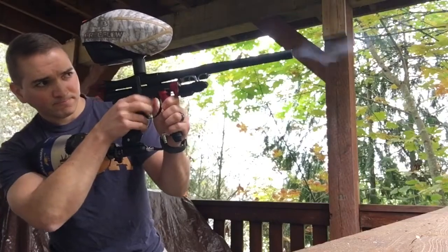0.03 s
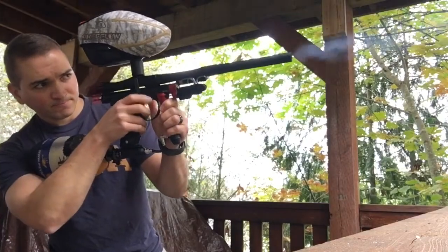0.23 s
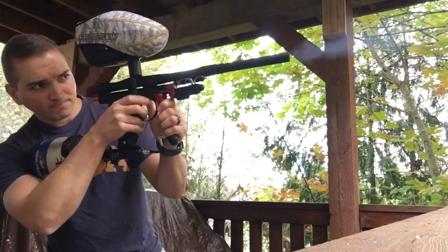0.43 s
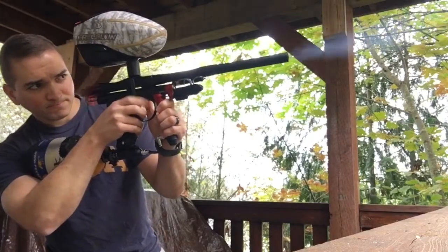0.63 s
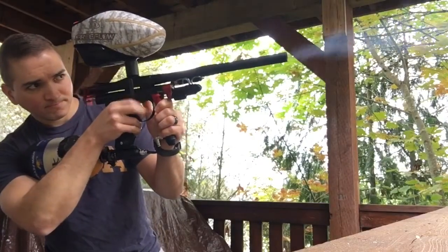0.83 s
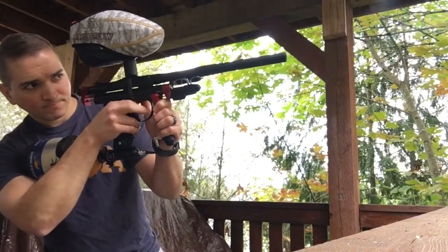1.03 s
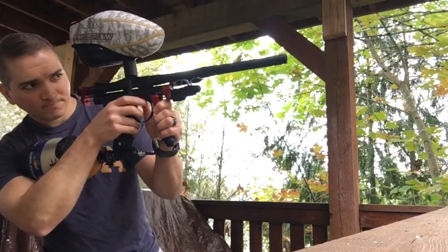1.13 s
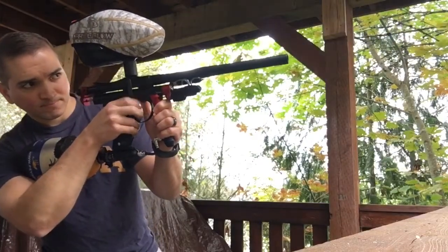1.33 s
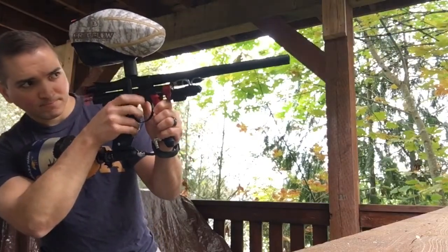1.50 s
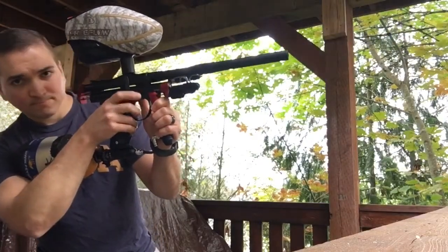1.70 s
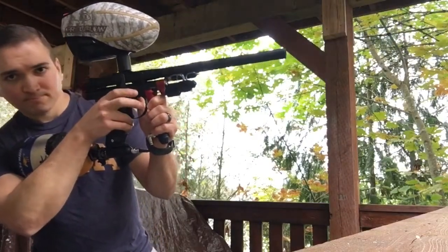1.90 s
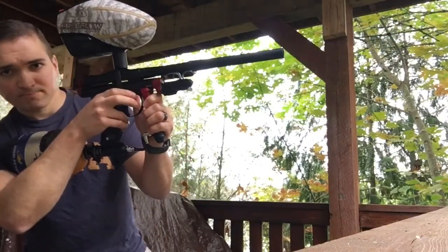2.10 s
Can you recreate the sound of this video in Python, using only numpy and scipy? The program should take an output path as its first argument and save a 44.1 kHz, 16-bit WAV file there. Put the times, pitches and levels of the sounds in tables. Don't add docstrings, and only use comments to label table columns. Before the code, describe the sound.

Paintball gun fires a fast even string of loud pops, then a few slower, uneven shots

```python
import sys
import numpy as np
from scipy import signal
from scipy.fft import rfft, irfft, next_fast_len
from scipy.io import wavfile
from scipy.ndimage import uniform_filter1d, map_coordinates

SR = 44100
rng = np.random.default_rng(int(sys.argv[2]) if len(sys.argv) > 2 else 0)


def store_pcm(level_fs):
    pcm = np.round(np.clip(level_fs, -1, 1) * 32767).astype(np.int16)
    wavfile.write(sys.argv[1], SR, np.atleast_2d(pcm).T)


def invert_db(level):
    return 10 ** (np.asarray(level, dtype=float) / 20)


N = 94859


def unit(x):
    return x / np.sqrt(np.mean(x ** 2) + 1e-20)


def along(points, hz):
    f, v = np.transpose(points)
    return np.interp(np.log(hz + 1), np.log(f + 1), v)


def filtered(x, response):
    m = next_fast_len(len(x) + 8192)
    return irfft(rfft(x, m) * response(np.fft.rfftfreq(m, 1 / SR)), m)[:len(x)]


def coloured(spectrum, size):
    return unit(filtered(rng.standard_normal(size), lambda hz: invert_db(along(spectrum, hz))))


def add(track, s, sound):
    track[max(round(s * SR), 0):][:len(sound)] += sound


def since(t, s):
    return np.clip(t - s, 0, None)


def sway(t, rate_hz):
    return map_coordinates(rng.standard_normal(200), [t * rate_hz])


# (f/Hz, level/dB per Hz)
LEAVES = [(200, -57), (400, 1), (800, -7), (1700, -7), (3000, -15), (5000, -22), (7500, -32), (12000, -71)]
# (t/s, level/dB)
LEAVES_LEVEL = [(0, -42), (1.0, -46.5), (1.3, -51), (1.7, -50), (1.9, -48), (2.15, -50.5)]
# (f/Hz, width/Hz, level/dB)
FEEDER_SHELL = [(800, 150, 2), (1310, 69, 5.5), (1715, 68, 4), (2690, 140, -2)]
# (f/Hz, level/dB per Hz)
RUMBLE = [(20, -39.5), (42, -4), (70, -1), (100, -6), (160, -12.5), (280, -8), (450, -22.5), (1000, -120)]
# (t/s, level/dB)
RUMBLE_LEVEL = [(0, -42), (.95, -42.5), (1.05, -45), (1.3, -45), (1.5, -47), (1.65, -50), (1.8, -43.5),
                (1.95, -45.5), (2.05, -45), (2.15, -42)]
SHELL_OVER_LEAVES_DB = -5


def garden():
    t = np.arange(N) / SR
    leaves_db = np.interp(t, *np.transpose(LEAVES_LEVEL))
    rumble_db = np.interp(t, *np.transpose(RUMBLE_LEVEL))
    leaves = invert_db(leaves_db + 2.6 * sway(t, 35)) * coloured(LEAVES, N)

    def shell_response(hz):
        return sum(invert_db(db) / (1 + (2 * (hz - centre) / width) ** 2) for centre, width, db in FEEDER_SHELL)

    hum = unit(filtered(rng.standard_normal(N), shell_response))
    hum *= invert_db(leaves_db + SHELL_OVER_LEAVES_DB + 4.2 * sway(t, 21))
    rumble = invert_db(rumble_db + 2.2 * sway(t, 11)) * coloured(RUMBLE, N)
    return leaves + hum + rumble


# (f/Hz, t60/s)
DECK_T60 = [(100, 0.097), (1000, 0.15), (4000, 0.13), (12000, 0.12)]
# (f/Hz, level/dB)
DECK_COLOUR = [(200, -1), (650, -3.5), (1500, -1), (5000, 0)]


def tail():
    hz, t, z = signal.stft(rng.standard_normal(SR // 3), SR, nperseg=256)
    decay_db = along(DECK_COLOUR, hz)[:, None] - 60 * t / along(DECK_T60, hz)[:, None]
    h = signal.istft(z * invert_db(decay_db), SR, nperseg=256)[1]
    return np.pad(h / np.linalg.norm(h), (150, 0))


def wet(dry, room, db):
    return np.pad(dry, (0, len(room) - 1)) + invert_db(db) * signal.fftconvolve(dry, room)


# (t/s, level/dB, brightness/dB)
RATTLES = [(.003, -30, 7), (.020, -21.5, -7), (0.027, -14, 2), (1.026, -37.5, 3), (1.029, -52, 11),
           (1.067, -33.5, 1), (1.091, -35, 5), (1.250, -31.5, 0.5), (1.306, -33, -2), (1.347, -40, 10),
           (1.352, -32, 2.5), (1.373, -30, 2), (1.645, -33.5, -1.5), (1.693, -48, -10), (1.733, -49, 15),
           (1.734, -50, 9), (1.742, -29.5, 0), (1.745, -33, -2), (1.749, -33, 7.5), (1.776, -32, 6),
           (1.979, -33.5, -24), (2.025, -32.5, -22), (2.074, -34, -26), (2.123, -35, -27)]
# (f/Hz, level/dB per Hz)
RATTLE_DULL = [(120, -120), (300, -5), (800, -1), (1400, 5.5), (2200, -1), (3200, 0), (4500, -16),
               (8000, -54)]
# (f/Hz, level/dB per Hz)
RATTLE_BRIGHT = [(2000, -120), (4500, 5.5), (7000, -10.5), (9000, -2), (12500, -14), (16500, -8)]
RATTLE_T60_S, RATTLE_RISE_S = 0.013, 0.00036


def rattles():
    out, t = np.zeros(N + SR), np.arange(SR // 20) / SR
    envelope = invert_db(-60 * t / RATTLE_T60_S) * (1 - np.exp(-t / RATTLE_RISE_S))
    for s, db, bright_db in RATTLES:
        tick = coloured(RATTLE_DULL, len(t)) + invert_db(bright_db - 6.5) * coloured(RATTLE_BRIGHT, len(t))
        add(out, s, invert_db(db - 1) * wet(tick * envelope, tail(), 1))
    return out[:N]


WANDER = 0.025


def ring(modes, scatter_db, detune, loose):
    t = np.arange(SR // 5) / SR
    hz, db, t60 = np.transpose(modes)[:, :, None]
    level, pitch, phase = rng.standard_normal((3, len(modes), 1))
    steps = rng.standard_normal((len(modes), len(t)))
    wander = np.cumsum(steps, axis=1) * np.sqrt(2 * np.pi * WANDER * hz / SR)
    envelope = invert_db(db + scatter_db * level - 60 * t / t60)
    angle = 2 * np.pi * hz * (1 + detune * pitch) * t + loose * phase + wander
    return np.sum(envelope * np.sin(angle), axis=0)


# (t/s, level/dB, gas hiss level/dB, low shove level/dB)
SHOTS = [(.0280, -4.5, 4.5, 1), (0.1279, -4.5, 1, -1), (0.2156, -4.5, 1.5, -0.5), (0.3024, -4.5, 1, 2),
         (0.3886, -2.5, -5, -2), (0.4894, -4, 5, 0), (0.5810, -4, 2, -0.5), (0.671, -4, 1.5, 0),
         (0.7538, -3.5, 1, -0.5), (.8432, -4, 1.5, 1), (0.9104, -4, 2.5, 0), (1.1276, -3, 1, 2),
         (1.4415, -6.5, 4.5, -3.5), (1.5280, -4.5, -1, -5)]
# (delay/s, gain, front length/s)
PATHS = [(0, .45, .0004), (.0004, .35, .0018), (.0033, .4, .0004), (.0036, .75, .0011), (.0046, .15, .0005),
         (.0051, .22, .0008), (.0059, .36, .0024), (.0089, .18, .001), (.0098, .35, .0014),
         (.0111, .22, .0007), (.0118, .15, .0005), (.0123, .22, .0008), (.013, .28, .0009)]
# (f/Hz, level/dB, t60/s)
BARREL = [(316, -8, 0.032), (615, -22, 0.044), (777, -17.5, 0.052), (983, -20.5, 0.057),
          (1266, -20.5, 0.032), (1418, -15.5, 0.055), (1528, -13.5, 0.05), (1670, -26, 0.034),
          (1888, -15.5, 0.05), (2097, -19.5, 0.015), (2497, -13.5, 0.032), (2662, -13.5, 0.045),
          (2918, -18, 0.0576)]
# (f/Hz, level/dB per Hz)
HISS = [(600, -120), (1300, -14), (2200, -1), (4200, -1.5), (6000, -21.5), (10500, -1), (14000, -4),
        (16500, -24.5)]
# (f/Hz, level/dB per Hz)
VENT = [(500, -120), (1500, 8), (3000, -8.5), (4400, 6.5), (5100, -14.5), (5900, 4.5), (7600, -5),
        (16500, -35)]
# (delay/s, level/dB)
SNAPS = [
    (.0001, -13.5),
    (.0034, -6.5),
    (.0088, -15.5),
    (.012, -4),
]
FRONT_GAIN, SNAP_T60_S = 0.99, 0.0012
PUSH_HZ, PUSH_DB, PUSH_T60_S, PUSH_SAG_PER_S = 192, -10, 0.085, 57.2
PUSH_PHASE, PUSH_LAG_S, PUSH_END_S = 2.6, 0.0068, 0.04
HISS_DB, HISS_T60_S, HISS_GRAIN_DB = -12, 0.014, 4
HISS_HOLD_S, HISS_START = 0.0036, 0.6
VENT_DB, VENT_T60_S = -19.5, 0.14
BLAST_WET_DB, FRESH_DB = -14.5, 8


def pressure_fronts(t):
    out = np.zeros(len(t))
    for delay, gain, length in PATHS:
        strength = gain * FRONT_GAIN * invert_db(3.1 * rng.standard_normal())
        out += strength * np.sin(2 * np.pi * np.clip((t - delay) / length, 0, 1))
    return out


def low_push(t, shove_db):
    cycles = PUSH_HZ * (1 - np.exp(-PUSH_SAG_PER_S * t)) / PUSH_SAG_PER_S
    push = np.sin(PUSH_PHASE + 2 * np.pi * cycles) * (1 - np.exp(-(t / PUSH_LAG_S) ** 2))
    return push * invert_db(PUSH_DB + shove_db - 60 * t / PUSH_T60_S) * np.exp(-(t / PUSH_END_S) ** 2)


def gas_jet(t, hiss_db):
    grain = unit(uniform_filter1d(rng.standard_normal(len(t)), size=30))
    hiss = invert_db(HISS_DB + hiss_db - 60 * since(t, HISS_HOLD_S) / HISS_T60_S) * coloured(HISS, len(t))
    hiss *= np.interp(t, [0, HISS_HOLD_S], [HISS_START, 1]) * invert_db(HISS_GRAIN_DB * grain)
    vent = invert_db(VENT_DB - 60 * t / VENT_T60_S) * coloured(VENT, len(t))
    snap = sum(invert_db(db - 60 * abs(t - delay) / SNAP_T60_S) * (t >= delay) for delay, db in SNAPS)
    return hiss + vent + snap * coloured(RATTLE_BRIGHT, len(t))


def blasts():
    out, t, deck = np.zeros(N + SR), np.arange(SR // 5) / SR, tail()
    for s, db, hiss_db, shove_db in SHOTS:
        add(out, s, invert_db(db) * low_push(t, shove_db))
        barrel = ring(BARREL, scatter_db=2.5, detune=0.016, loose=0.84) * (1 - np.exp(-t / 0.0016))
        dry = pressure_fronts(t) + gas_jet(t, hiss_db) + barrel
        add(out, s, invert_db(db) * wet(dry, deck + invert_db(FRESH_DB) * tail(), BLAST_WET_DB))
    return out[:N]


EDGE_S, REBOUND_S, METAL_WET_DB = 0.00015, 0.0029, -4.5


def contact(modes, crack, crack_db, crack_t60_s, rebound_db):
    t = np.arange(SR // 5) / SR

    def blow():
        noise = invert_db(crack_db - 60 * t / crack_t60_s) * coloured(crack, len(t))
        body = ring(modes, scatter_db=1, detune=0.013, loose=1.43)
        return (body + noise) * (1 - np.exp(-t / EDGE_S))

    blows = blow() + invert_db(rebound_db) * np.roll(blow(), round(REBOUND_S * SR))
    return wet(blows, tail(), METAL_WET_DB)


# (t/s, level/dB)
BOLT = [(.0983, -12), (.1873, -11), (.2768, -12), (.3667, -11), (.4682, -13), (.5594, -13), (.6496, -11),
        (.7314, -12), (.8209, -12), (.8888, -14), (1.1060, -11), (1.3900, -7), (1.5059, -13), (1.7913, -5)]
# (t/s, level/dB)
STOP = [(.1142, -14), (.2024, -13), (.2921, -13), (.3821, -11), (.4840, -12), (.5754, -14), (.6653, -13),
        (.7473, -14), (.8365, -14), (.9044, -13), (1.1230, -9), (1.4065, -8), (1.5219, -11), (1.8075, -9)]
# (f/Hz, level/dB, t60/s)
TICK_RING = [(2110, 3.5, 0.0029), (3600, 3.5, 0.0013)]
# (f/Hz, level/dB, t60/s)
BOLT_RING = [(1217, -11.5, 0.088), (1650, -12, 0.012), (1920, -5.5, 0.013), (2344, -6.5, 0.012),
             (3850, -1, 0.0055), (4460, -4.5, 0.0089)]
# (f/Hz, level/dB, t60/s)
STOP_RING = [(323, -16.5, 0.028), (2530, -13, 0.022), (3140, -4, 0.015), (3600, -9, 0.017)]
# (f/Hz, level/dB per Hz)
FILL = [(500, -120), (1500, -19.5), (4500, 1.5), (6200, 1.5), (7500, -17), (11000, -11), (14500, -4),
        (16500, -14)]
# (f/Hz, level/dB per Hz)
BOLT_CRACK = [(200, -120), (600, -10), (1300, 5), (4500, 0), (6200, -3.5), (7500, -15.5), (11000, -9.5),
              (16500, -15.5)]
# (f/Hz, level/dB per Hz)
STOP_CRACK = [(300, -120), (900, -2.5), (3200, -2.5), (5000, -8.5), (7500, -10.5), (9500, -20),
              (12500, -12), (16500, -24)]
SOLENOID_LEAD_S, SOLENOID_DB = 0.0109, -4.5
FILL_DB, FILL_T60_S = -23, 0.12


def action():
    out, t = np.zeros(N + SR), np.arange(round(SOLENOID_LEAD_S * SR)) / SR
    for (s, db), (stop_s, stop_db) in zip(BOLT, STOP):
        tick = contact(TICK_RING, BOLT_CRACK, crack_db=-21.5, crack_t60_s=0.0025, rebound_db=-6)
        fill = invert_db(FILL_DB - 60 * t / FILL_T60_S) * coloured(FILL, len(t))
        clack = contact(BOLT_RING, BOLT_CRACK, crack_db=2, crack_t60_s=0.0086, rebound_db=-4.5)
        stop = contact(STOP_RING, STOP_CRACK, crack_db=0.5, crack_t60_s=0.013, rebound_db=-10.5)
        add(out, s - SOLENOID_LEAD_S, invert_db(db + SOLENOID_DB) * tick)
        add(out, s - SOLENOID_LEAD_S, invert_db(db) * fill)
        add(out, s, invert_db(db - 4) * clack)
        add(out, stop_s, invert_db(stop_db - 4) * stop)
    return out[:N]


# (f/Hz, level/dB per Hz)
BURST = [(60, -34), (165, -3), (350, -1), (650, -11), (1100, -5.5), (3000, -11.5), (4500, -20),
         (7000, -32.5)]
# (f/Hz, level/dB, t60/s)
SLOSH = [(165.5, -3.5, 0.067)]
LEAK_S, LEAK_RISE_S = 1.432, 0.0022
BURST_S, BURST_SWELL_S, BURST_DB, BURST_T60_S = 1.450, 0.026, -12, 0.13
TEAR_S, TEAR_RISE_S, TEAR_HOLD_S, TEAR_DB, TEAR_T60_S = 1.4425, 0.0021, 0.01, -13.5, 0.0256
SLOSH_S, SLOSH_RISE_S = 1.441, 0.017


def burst():
    t = np.arange(N) / SR
    swell = np.exp(np.clip(t - BURST_S, None, 0) / BURST_SWELL_S)
    leak = invert_db(BURST_DB - 60 * since(t, BURST_S) / BURST_T60_S) * swell * coloured(BURST, N)
    leak *= 1 - np.exp(-since(t, LEAK_S) / LEAK_RISE_S)
    jet = invert_db(TEAR_DB - 60 * since(t, TEAR_S + TEAR_HOLD_S) / TEAR_T60_S) * coloured(HISS, N)
    jet *= 1 - np.exp(-since(t, TEAR_S) / TEAR_RISE_S)
    boom = ring(SLOSH, scatter_db=1, detune=0, loose=0)
    boom *= 1 - np.exp(-(t[:SR // 5] / SLOSH_RISE_S) ** 2)
    dry = leak + jet
    add(dry, SLOSH_S, boom)
    return wet(dry, tail(), BLAST_WET_DB)[:N]


def scene():
    return (garden() + rattles() + blasts() + action() + burst())[None]


LOW_CUT_HZ, TOP_HZ = 8.2, 15900
CLIP_TOP, CLIP_HARD = 1, 7.2


def top_cut(x):
    return signal.sosfilt(signal.butter(12, 16460, fs=SR, output="sos"), x)


def record(dry):
    x = filtered(dry[0], lambda hz: (1j * hz / (LOW_CUT_HZ + 1j * hz)) ** 4)
    x = x / (1 + abs(x / CLIP_TOP) ** CLIP_HARD) ** (1 / CLIP_HARD)
    x = filtered(x, lambda hz: 1 / (1 + (hz / TOP_HZ) ** 200))
    return top_cut(x[None])


dry = scene()
out = record(dry)
store_pcm(out)
```